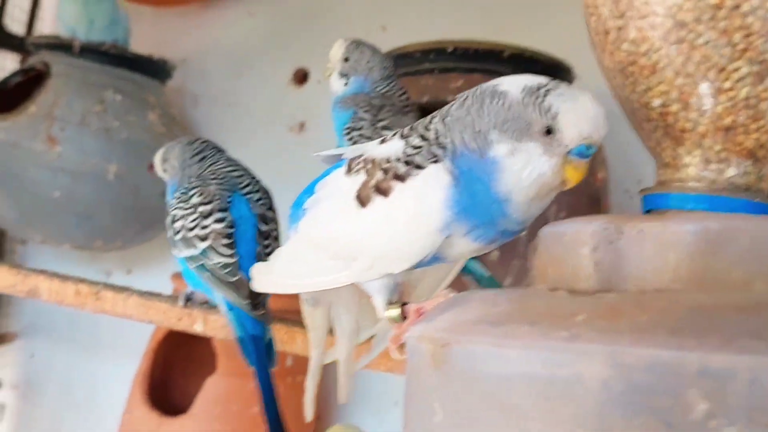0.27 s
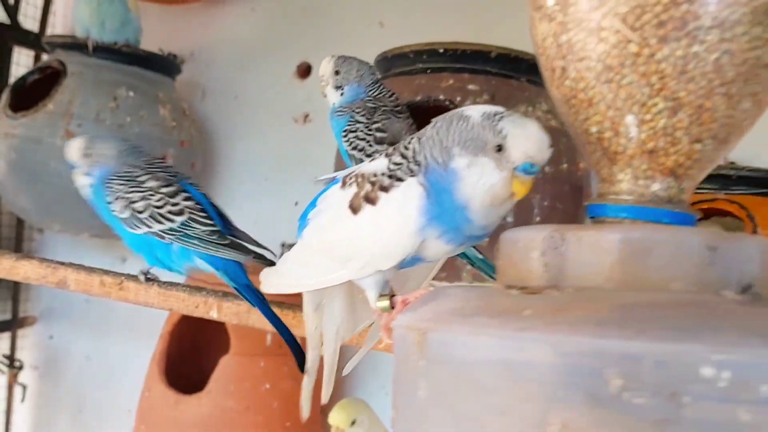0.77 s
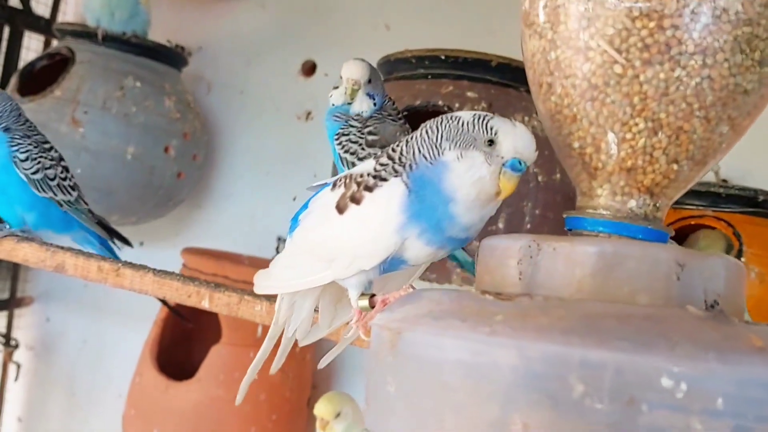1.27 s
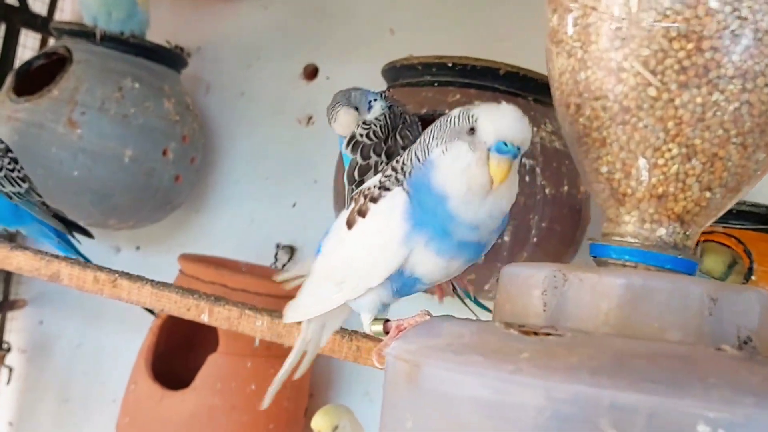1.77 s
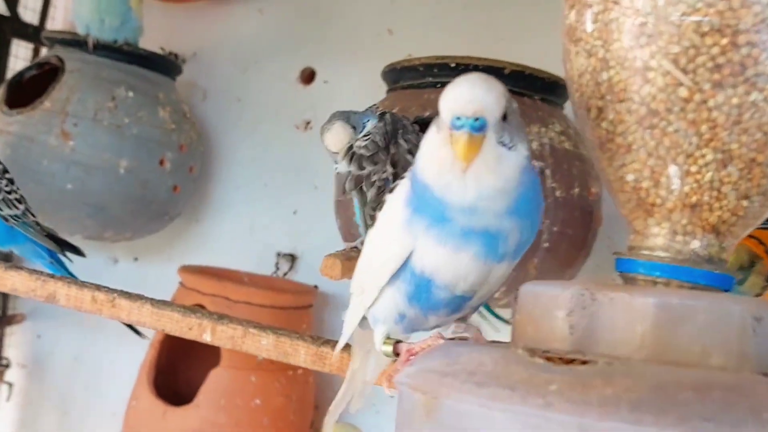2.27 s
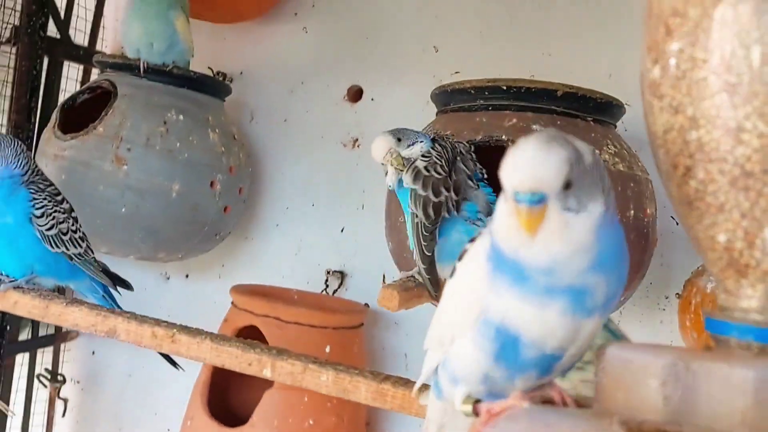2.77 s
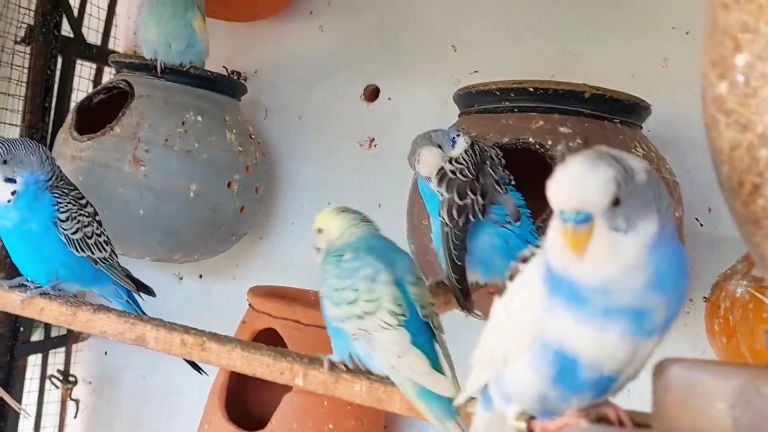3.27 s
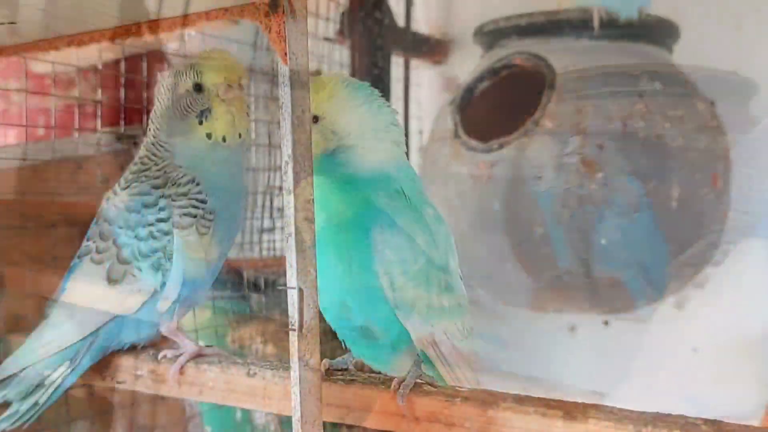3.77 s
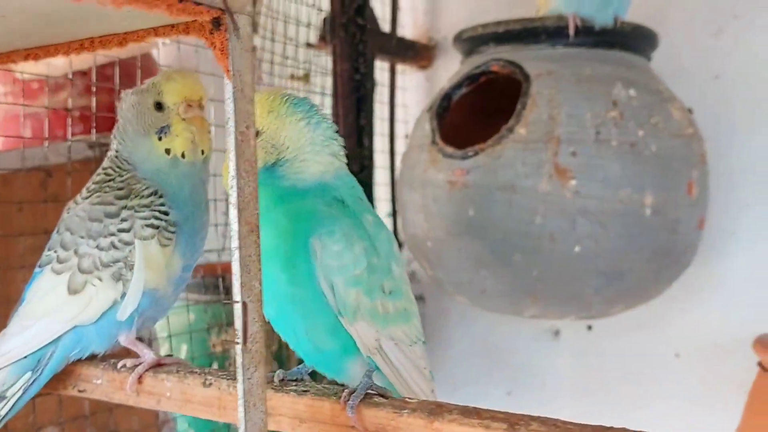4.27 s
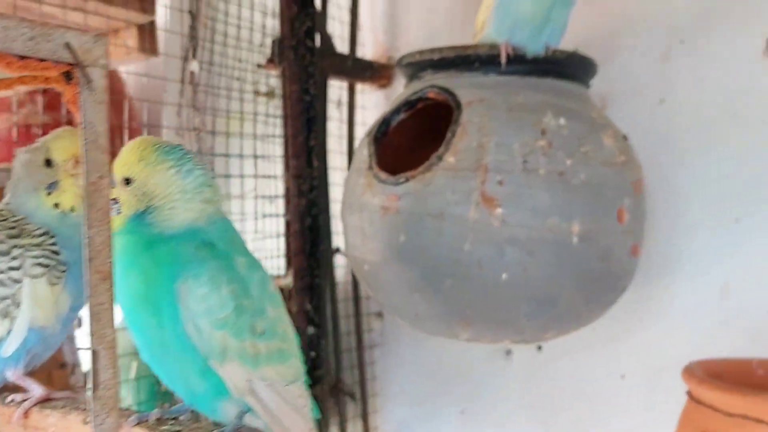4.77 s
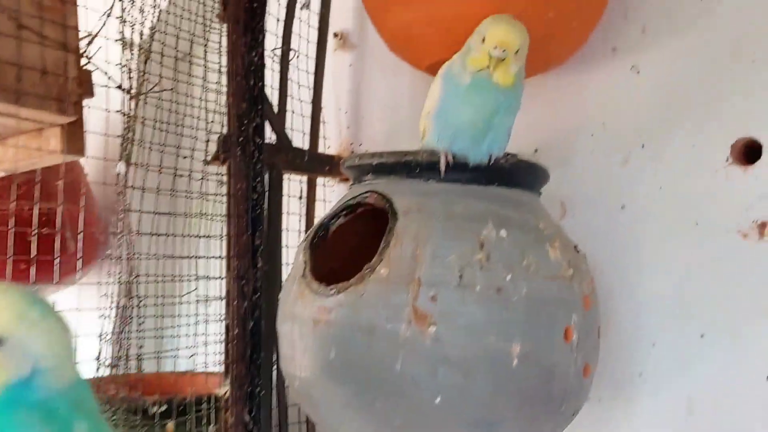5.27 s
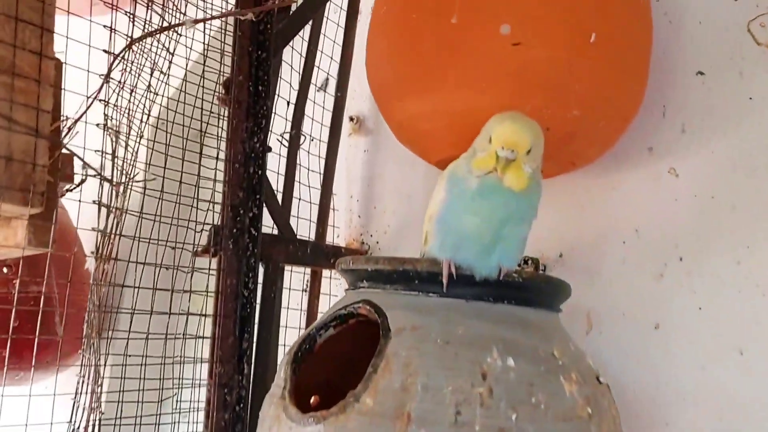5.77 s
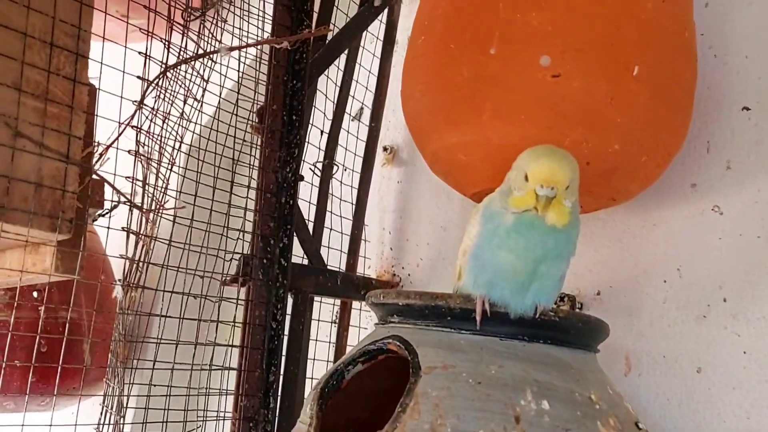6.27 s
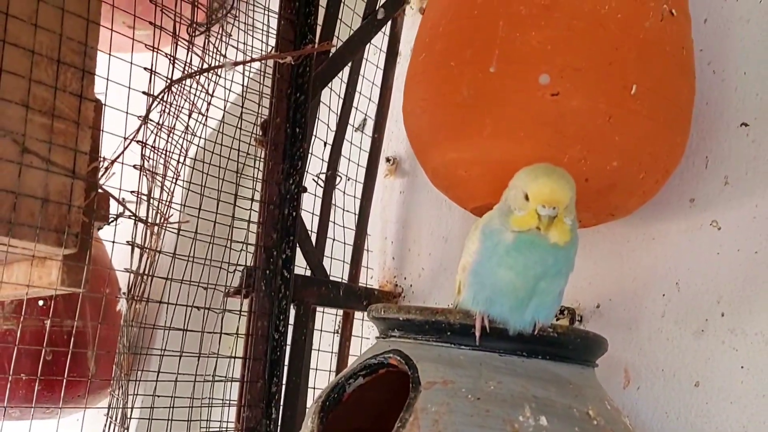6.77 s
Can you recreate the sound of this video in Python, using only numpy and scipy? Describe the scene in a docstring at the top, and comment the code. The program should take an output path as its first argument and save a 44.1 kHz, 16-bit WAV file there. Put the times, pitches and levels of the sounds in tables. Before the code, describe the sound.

A stereo close pickup of small parrots among clay pots: scattered short chirps, one very loud high shriek around one second, then sparse quiet calls over distant flock murmur and faint low rumble. Near four seconds the chatter thickens into rapid bright chirps, rough chucks and harsh rasps, with a sharp beak tap. Another burst of shrill cries comes around six and a half seconds before smaller chirps finish.

```python
"""Budgerigars chatter in a small aviary, over a faint hum, drone and rumble and a warbling flock.
Rasps (chopped voice and hiss), chucks and gliding chirps (modulated tones with overtones) open;
piercing shrieks and nasal calls (pulses under a throat resonance) follow, then taps (damped rings),
arched whistles and wing flutters (beating noise). The near chatter is densest from about 4 s on.
Close walls add brief reflections to all the bird sounds."""
import sys
import numpy as np
from scipy import signal
from scipy.fft import rfft, irfft, next_fast_len
from scipy.io import wavfile
from scipy.ndimage import map_coordinates

SR = 44100
rng = np.random.default_rng(int(sys.argv[2]) if len(sys.argv) > 2 else 0)


def dump_mix(stems):
    """Bounce the given channels to the path in sys.argv[1] as a 16-bit WAV at rate SR."""
    frames = np.atleast_2d(stems).T  # one column per channel
    limited = np.clip(frames, -1, 1)  # hard clip at full scale
    pcm = np.round(limited * 32767).astype(np.int16)
    wavfile.write(sys.argv[1], SR, pcm)


N = 309141

# Levels are relative: source gains, stereo balance and reflections come on top.
# Hum: time_s, level_db
HUM = [(0, -44.5), (.9, -42), (1.3, -50.5), (1.9, -53), (2.3, -46), (2.85, -42), (3, -67), (3.4, -49),
       (3.7, -42), (4.1, -36), (5.05, -34), (5.25, -62), (7.01, -56)]
# Drone above the hum: time_s, level_db
DRONE = [(0, -40.5), (.45, -42.5), (1.1, -55.5), (1.7, -58), (5.6, -59.5), (5.9, -42.5), (6.2, -64),
         (7.01, -59)]
# Low rumble: time_s, level_db
RUMBLE = [(0.0, -41), (1.74, -53), (2.16, -45.5), (3.96, -47), (4.63, -41), (6.81, -48.5), (7.01, -45.5)]
# Rumble spectrum: frequency_hz, density_db
RUMBLE_COLOUR = [(25, -22), (60, -5), (130, 4), (190, -1), (260, 7), (400, 0), (600, -6.5), (1200, -9.5),
                 (4000, -36), (12000, -37)]
# Distant flock: time_s, level_db
FLOCK = [(0.0, -33.5), (2.01, -38.5), (2.44, -30.5), (3.22, -39.5), (3.9, -26), (4.51, -23.5), (4.78, -19),
         (5.78, -26), (5.92, -23.5), (7.01, -23.5)]
# Flock wash spectrum: frequency_hz, density_db
FLOCK_COLOUR = [(400, -16.5), (800, -11), (1400, -3.5), (2400, -6.5), (4400, -6.5), (5600, -14),
                (8000, -23.5), (10000, -43.5), (15000, -54)]
# Stereo balance of the birds: time_s, left_minus_right_db
PAN = [(0, 1), (3.7, .3), (5, 2.5), (7.01, 2)]
# Harsh scolding rasps: start_s, length_s, level_db
RASPS = [(0.043, .014, -28.5), (0.321, 0.047, -21), (0.436, 0.0089, -25), (0.978, 0.014, -11),
         (2.281, 0.036, -28.5), (2.367, 0.062, -23), (2.441, 0.078, -22.5), (2.577, 0.097, -36),
         (3.681, .058, -32), (3.853, 0.08, -33.5), (4.062, 0.13, -28.5), (4.256, 0.092, -30),
         (4.569, .017, -27), (4.641, 0.011, -23), (4.759, 0.029, -28.5), (4.877, 0.15, -21),
         (5.022, 0.028, -21), (5.141, 0.07, -12), (5.234, 0.076, -16.5), (5.33, 0.081, -21),
         (5.419, 0.094, -16), (5.492, 0.098, -19), (5.607, 0.067, -19), (5.717, 0.21, -26.5),
         (5.987, 0.16, -25.5), (6.057, 0.06, -19), (6.159, 0.084, -21.5), (6.285, 0.015, -21),
         (6.45, 0.052, -14), (6.53, 0.028, -14.5), (6.761, 0.0077, -25.5)]
# Rasp spectrum: frequency_hz, density_db
RASP_COLOUR = [(500, -58), (1400, -18.5), (2800, 3.5), (4500, 3.5), (6600, -3.5), (8200, -12),
               (9600, -35.5), (12500, -25), (16000, -62)]
# Short rough chucks: start_s, pitch_hz, level_db
CHUCKS = [(.044, 1412, -28.5), (.7, 2190, -29), (0.774, 2146, -25.5), (.829, 2174, -24),
          (.921, 2270, -23.5), (1.147, 2280, -29.5), (1.229, 2495, -33), (1.294, 2280, -34),
          (1.372, 2170, -36), (1.655, 2180, -32.5), (2.128, 2190, -24), (2.2, 2270, -29.5),
          (2.515, 2324, -22), (2.585, 2880, -26.5), (4.256, 2710, -19.5), (4.484, 1940, -21.5),
          (4.563, 1945, -14.5), (4.675, 1943, -18), (4.727, 2006, -20), (4.828, 995, -25),
          (4.936, 1287, -24), (5.018, 1077, -26.5), (5.093, 2296, -16.5), (5.631, 2413, -16.5),
          (5.762, 1900, -16), (6.052, 2390, -20), (6.235, 1965, -20.5), (6.262, 1980, -16.5),
          (6.281, 2760, -24.5)]
# Gliding chirps: start_s, length_s, start_hz, end_hz, level_db, roughness (0-1)
CHIRPS = [(0.097, 0.076, 1502, 1492, -23.5, 0.06), (0.203, 0.031, 2170, 2580, -28.5, 0.25),
          (.263, .06, 2950, 2700, -24.5, 0.3), (.3, 0.034, 3070, 1894, -15, 0.4),
          (0.325, 0.047, 3300, 2850, -14.5, 0.28), (0.365, 0.033, 2250, 2380, -18.5, .1),
          (0.415, 0.018, 2237, 1690, -15.5, 0.25), (0.426, 0.016, 2520, 2535, -15.5, 0.25),
          (0.626, .049, 1640, 1413, -32, 0.08), (0.983, 0.02, 4000, 2500, -14.5, 0.48),
          (1.055, 0.018, 4600, 2600, -20, .8), (1.763, 0.087, 2150, 2300, -33.5, 0.33),
          (1.95, 0.058, 3150, 2570, -32, 0.42), (2.021, 0.05, 3630, 2610, -29, .12),
          (2.078, 0.062, 3204, 2660, -25.5, .1), (3.739, 0.029, 2900, 2194, -26, 0.42),
          (3.775, 0.0285, 2530, 3360, -27, 0.03), (3.838, 0.032, 3030, 2390, -22, 0.29),
          (3.878, 0.012, 2130, 2850, -17, 0.2), (3.971, 0.074, 2060, 2370, -22, 0.37),
          (4.106, 0.015, 2270, 2695, -18.5, 0), (4.142, 0.026, 4050, 3140, -17, 0.2),
          (4.409, 0.02, 3070, 2475, -15.5, 0.2), (4.613, 0.034, 4260, 4230, -16, 0.14),
          (4.631, 0.057, 3020, 2855, -10, 0.19), (4.679, 0.069, 3447, 3486, -11, 0.24),
          (4.756, 0.025, 3220, 2390, -11.5, 0.03), (4.76, .032, 5350, 4310, -18.5, .3),
          (4.78, 0.025, 2860, 3320, -12, 0.33), (4.95, 0.076, 2780, 3120, -15, 0.16),
          (5.021, 0.032, 3100, 2607, -13.5, 0.6), (5.116, 0.041, 2870, 3280, -10, 0.25),
          (5.218, 0.03, 3320, 3560, -14, 0.24), (5.377, .033, 3280, 2690, -17.5, 0.23),
          (5.485, 0.063, 3460, 3510, -18, 0.45), (5.67, 0.0293, 3760, 3280, -13.5, .18),
          (5.705, 0.082, 2900, 2433, -11.5, .18), (5.77, 0.04, 3940, 3190, -16, .2),
          (5.799, 0.041, 2573, 2705, -10, .12), (5.839, .077, 2213, 2834, -10.5, 0.14),
          (5.903, 0.035, 2714, 2000, -14.5, 0.64), (6.085, .054, 2880, 2170, -10.5, .18),
          (6.088, 0.0375, 4240, 3700, -16.5, .25), (6.133, 0.04, 2670, 2960, -16.5, .35),
          (6.272, .011, 4110, 4400, -13.5, .05), (6.455, 0.036, 2360, 2600, -11.5, 0.16),
          (6.539, 0.045, 2604, 2876, -7.5, 0.42), (6.591, 0.029, 2415, 2000, -16, .35),
          (6.636, .084, 2200, 1250, -32, .25), (6.754, 0.055, 2320, 2110, -23, 0.2),
          (6.808, 0.043, 1916, 2250, -16, 0.2), (6.843, 0.061, 2884, 3050, -20.5, 0.2),
          (6.9, 0.076, 2437, 2160, -21.5, 0.13), (6.933, 0.026, 2775, 3266, -21, 0.36)]
# Piercing near syllables: start_s, length_s, start_hz, end_hz, level_db, roughness (0-1)
SHRIEKS = [(0.433, 0.0072, 5000, 5380, -23, 0.08), (0.955, .026, 4935, 4520, -6, 0.14),
           (0.984, 0.032, 5176, 5415, -3, 0.15), (1.016, .028, 5480, 5133, -4.5, .16),
           (1.044, 0.013, 6380, 6480, -10.5, 0.02), (1.193, 0.0125, 4450, 4190, -27.5, 0.37),
           (1.211, .015, 6380, 6480, -26, 0.16), (6.465, 0.028, 4770, 4650, -9, 0.71),
           (6.484, 0.037, 4660, 5420, -4, 0.13), (6.514, 0.02, 5740, 6700, -11, 0.08),
           (6.536, 0.027, 4500, 4650, -13, 0.71), (6.568, .026, 3860, 4600, -6.5, .14),
           (6.597, 0.031, 4860, 4730, -6.5, .04)]
# Nasal calls: start_s, length_s, pitch_hz, throat_hz, level_db
NASALS = [(0.477, 0.12, 408, 2670, -63), (0.562, 0.075, 685, 3050, -50), (2.615, 0.076, 429.5, 2750, -33.5),
          (3.074, 0.11, 702, 3840, -35.5), (3.504, .14, 515, 3760, -33), (3.858, 0.088, 521, 4900, -34),
          (4.165, 0.15, 577, 3860, -24.5), (4.471, 0.13, 617, 4000, -26.5),
          (4.821, 0.092, 561, 3760, -21.5), (6.361, 0.12, 575, 3730, -28), (6.439, 0.049, 578, 1090, -30.5),
          (6.595, 0.085, 619, 1460, -32)]
# Pitch sag of louder nasal calls: level_db, share_lost (0-1)
SAG = [(-35, 0.02), (-30.5, 0.17)]
# Beak clicks and foot knocks on perches and pots: start_s, ring_hz, decay_t60_s, level_db
TAPS = [(1.011, 362, 0.084, -16.5), (1.013, 230, 0.089, -26.5), (2.839, 238, 0.18, -32.5),
        (3.018, 1480, 0.028, -31), (3.365, 1430, 0.023, -34), (3.391, 4200, 0.022, -32),
        (3.709, 2250, 0.0068, -18.5), (4.675, 2520, 0.036, -6), (6.319, 2010, 0.022, -22),
        (6.328, 1960, 0.021, -13.5), (6.339, 1980, 0.02, -15)]
# One bird's repeated whistle: start_s, arch_length_s, level_db
WHISTLES = [(1.526, 0.072, -30.5), (2.834, 0.084, -28), (3.357, .072, -32), (4.689, 0.083, -29)]
# Whistle arch: start_hz, middle_hz, end_hz
ARCH_HZ = [5080, 6090, 5030]
# Held note after the arch: start_hz, middle_hz, end_hz
HOLD_HZ = [5170, 4484, 4570]
# Wing flutters: start_s, length_s, level_db
FLUTTERS = [(2.101, 0.42, -48), (3.036, 0.14, -41), (3.421, 0.27, -40), (5.293, 0.15, -36),
            (5.748, 0.11, -38)]
# Wing noise spectrum: frequency_hz, density_db
WING_COLOUR = [(30, -42), (70, 3), (200, -2.5), (400, 5), (600, -2), (1200, -8.5), (5000, -37)]

TIME_S = np.arange(N) / SR
TOP_HZ = 16100  # upper band limit
WASH_DB = -11  # before the flock level
LAG_SPREAD_MS = .18  # birds perch all around the two microphones
RASP_LAG_MS, RASP_LAG_SPREAD_MS = -.19, .05  # negative: left first
RASP_HZ, RASP_DB, RASP_OCTAVES_PER_DB = 5060, -18, .002  # louder rasps are brighter
OVERTONE_HZ, OVERTONE_DB_PER_OCTAVE = 1854, -16.5  # the beak favours overtones of low notes
SETTLE = .7  # share of a glide done half way through
EARLY_T60_S = .054


def undb(db):
    """Decibels to amplitude gain."""
    return 10 ** (np.asarray(db) / 20)


def unit(x):
    """Scale to rms 1."""
    return x / np.sqrt(np.mean(x ** 2) + 1e-18)


def curve(rows):
    """Interpolate (time_s, value) rows at every sample."""
    return np.interp(TIME_S, *np.transpose(rows))


def wobble(size, rate_hz):
    """Smooth random signal, spread near 1, with rate_hz random points per second."""
    steps = np.arange(size) * rate_hz / SR
    return map_coordinates(rng.standard_normal(2048), [steps], order=3, mode="wrap")


def colour(x, points, shift=0.99):
    """Filter x by (frequency_hz, db) points, frequencies scaled by shift; rms 1."""
    size = next_fast_len(x.shape[-1] + 256)
    hz, db = np.transpose(points)
    log_hz = np.log(np.fft.rfftfreq(size, 1 / SR) + 1)
    gain = undb(np.interp(log_hz, np.log(hz * shift), db))
    return unit(irfft(rfft(x, size) * gain, size)[..., :x.shape[-1]])


def swell(length_s, bluntness, lean=0.84):
    """Progress 0-1 and a rounded rms-1 envelope, quicker to rise than to fall."""
    u = np.linspace(0, 1, max(int(length_s * SR), 64))
    build_up = 1 - np.exp(-u * length_s / .002)
    arch = np.abs(np.sin(np.pi * u ** lean)) ** bluntness
    return u, unit(build_up * arch)


def add(out, x, start_s, lag_ms=0.):
    """Mix x into both channels; positive lag_ms delays left against right."""
    for row, side in zip(out, (1, -1)):
        start = int(np.clip(round((start_s + side * lag_ms / 2e3) * SR), 0, N - 1))
        row[start:start + len(x)] += x[:N - start]


def background(hum_hz=100.6, drone_hz=135, hum_db=-1, rumble_db=1, apart=0.87):
    """Mains hum, wavering drone and low noise rumble; the rumble differs partly between sides."""
    hum = np.sin(2 * np.pi * hum_hz * TIME_S) * undb(curve(HUM) + hum_db)
    drone_phase = 2 * np.pi * np.cumsum(drone_hz + 3 * wobble(N, 13)) / SR
    drone = np.sin(drone_phase) * undb(curve(DRONE))
    noise = rng.standard_normal(N) + apart * rng.standard_normal((2, N))
    rumble_level_db = curve(RUMBLE) + rumble_db + 3.86 * wobble(N, 21)
    rumble = colour(noise, RUMBLE_COLOUR) * undb(rumble_level_db)
    balance = undb(np.array([[.8], [-.8]]))
    return (np.sqrt(2) * (hum + drone) + rumble) * balance


def syrinx(length_s, pitches_hz, rough, overtone_db, buzz_hz=680, spread_hz=620, shake_hz=260,
           bite=1.15, throb=0.27, step_db=-8, beak_hz=7500):
    """One gliding note; a slower membrane chops and bends it, turning whistle into chuck."""
    u, envelope = swell(length_s, 0.33)
    rough = np.clip(rough, 0, 1)
    zigzag = (.006 + .3 * min(rough, .42) ** 2) * wobble(len(u), 130)
    grains = (throb + .5 * rough) * wobble(len(u), 206.6)
    # parabola through start, middle and end pitch
    hz = np.polyval(np.polyfit([0, .5, 1], pitches_hz, 2), u) * (1 + zigzag)
    membrane_hz = buzz_hz * (1 + 0.21 * wobble(len(u), 157.3))
    buzz = np.cos(2 * np.pi * np.cumsum(membrane_hz) / SR)
    bend_hz = rough * (spread_hz * buzz + shake_hz * wobble(len(u), 696.0))
    phase = 2 * np.pi * np.cumsum(hz + bend_hz) / SR
    tone = np.sin(phase)
    for k in range(2, 5):
        beak = (k * hz < TOP_HZ) / np.hypot(1, (k * hz / beak_hz) ** 3)
        overtone_gain = undb(min(overtone_db, 3) + (k - 1.5) * step_db)
        tone = tone + overtone_gain * beak * np.sin(k * phase)
    strength = np.exp(grains + bite * rough * buzz)
    # the short windpipe radiates little below the note
    windpipe = signal.butter(3, .55 * min(pitches_hz), "high", fs=SR, output="sos")
    return signal.sosfilt(windpipe, tone * unit(envelope * strength)) * np.sqrt(2)


def nasal(length_s, start_hz, end_hz, throat_hz, width_octaves=0.34, chest_db=-13):
    """Gliding harmonics, each wavering in level, under a broad throat resonance."""
    u, envelope = swell(length_s, 0.4)
    hz = (start_hz + (end_hz - start_hz) * u ** 1.4) * (1 + .011 * wobble(len(u), 320))
    phase = 2 * np.pi * np.cumsum(hz) / SR
    tone = 0
    for k in range(2, 14):
        throat = np.exp(-.5 * (np.log2(k * hz / throat_hz) / width_octaves) ** 2)
        chest = undb(chest_db) * (k * hz < throat_hz)
        waver = undb(4.5 * np.interp(u, np.linspace(0, 1, 6), rng.standard_normal(6)))
        line = np.sin(k * phase + 2 * np.pi * rng.random())
        tone = tone + waver * (throat + chest) * line
    return unit(tone) * envelope


def flock(count=160, chucks_db=-4.5, calls_share=0.57):
    """Distant chucks, a nasal call with every second one, and noise for their blurred echoes."""
    chuck_mix, call_mix = np.zeros((2, 2, N))
    for k, draws in enumerate(rng.random((count, 8))):
        when, length, pitch, bend, slide, rough, throat, side = draws
        start_s, lag_ms = (k + when) * N / SR / count, side - .5
        hz = (1450 + 1800 * pitch) * np.array([1, 0.74 + 0.26 * bend, 0.645 + .5 * slide])
        chuck = syrinx(0.0203 + 0.0349 * length, hz, .15 + .45 * rough, -16.0)
        add(chuck_mix, chuck, start_s, lag_ms=lag_ms)
        if k % 2:
            call_hz = 380 + 300 * bend
            end_hz = call_hz * (.92 + 0.1115 * slide)
            call = nasal(0.0585 + 0.051 * rough, call_hz, end_hz, 2500 + 2000 * throat)
            add(call_mix, call, start_s, lag_ms=-lag_ms)
    voices = unit(chuck_mix) + calls_share * unit(call_mix)
    wash = colour(rng.standard_normal((2, N)), FLOCK_COLOUR) * undb(4.62 * wobble(N, 30))
    return (voices * undb(chucks_db) + wash * undb(WASH_DB)) * undb(curve(FLOCK))


def rasps(pulse_hz=230, reference_hz=5000, voice_hz=750, hiss_db=-4):
    """A jittering voice and hiss, chopped into uneven puffs, ring the throat and open beak."""
    out = np.zeros((2, N))
    for (start_s, length_s, db), side in zip(RASPS, rng.standard_normal(len(RASPS))):
        centre_hz = RASP_HZ * 2 ** (RASP_OCTAVES_PER_DB * (db - RASP_DB))
        u, envelope = swell(length_s + 0.011, 0.85, lean=.72)
        pulse = 2 * np.pi * np.cumsum(pulse_hz * (1 + 0.313 * wobble(len(u), 197.2))) / SR
        voice = 2 * np.pi * np.cumsum(voice_hz * (1 + 0.0509 * wobble(len(u), 220.5))) / SR
        squeal = 0
        for k in range(2, 19):
            flare = np.exp(.4 * wobble(len(u), 160))  # separate for each overtone
            squeal = squeal + np.sin(k * voice + 2 * np.pi * rng.random()) * flare
        puffs = np.exp(.65 * np.cos(pulse) + .1 * wobble(len(u), 110))
        hiss = rng.standard_normal(len(u)) * undb(hiss_db)
        rasp = colour(puffs * (unit(squeal) + hiss), RASP_COLOUR, centre_hz / reference_hz)
        lag_ms = RASP_LAG_MS + RASP_LAG_SPREAD_MS * side
        add(out, rasp * envelope * undb(db), start_s - .002, lag_ms=lag_ms)
    return out


def overtone_tilt(hz):
    """Decibels the beak adds to the overtones of a note at this pitch."""
    return OVERTONE_DB_PER_OCTAVE * np.log2(hz / OVERTONE_HZ)


def chucks(length_s=.023, rise=1.143, rough=0.368, overtone_db=-7, gain_db=-0.5, lag_ms=-0.058):
    """Brief throaty syllables of one pitch shape: nearly level, then flicked upward."""
    out = np.zeros((2, N))
    for (start_s, hz, db), side in zip(CHUCKS, rng.standard_normal(len(CHUCKS))):
        note = syrinx(length_s, [hz, hz, hz * rise], rough, overtone_db + overtone_tilt(hz))
        add(out, note * undb(db + gain_db), start_s, lag_ms=lag_ms + LAG_SPREAD_MS * side)
    return out


def glide(length_s, start_hz, end_hz, rough, overtone_db, overhang_s=.002):
    """A note that slides quickly from its first pitch and settles on its last."""
    middle_hz = start_hz + SETTLE * (end_hz - start_hz)
    return syrinx(length_s + 2 * overhang_s, [start_hz, middle_hz, end_hz], rough, overtone_db)


def chirps(gain_db=-3.5, overtone_db=-11.0, lag_ms_per_db=0.11):
    """Near birds' rising and falling notes, overtones weaker at higher pitch."""
    out = np.zeros((2, N))
    for row, side in zip(CHIRPS, rng.standard_normal(len(CHIRPS))):
        start_s, length_s, start_hz, end_hz, db, rough = row
        note = glide(length_s, start_hz, end_hz, rough, overtone_db + overtone_tilt(end_hz))
        # mean lag follows the stereo balance
        lag_ms = lag_ms_per_db * np.interp(start_s, *np.transpose(PAN)) + LAG_SPREAD_MS * side
        add(out, note * undb(db + gain_db), start_s, lag_ms=lag_ms)
    return out


def shrieks(gain_db=0.0, overtone_db=-14, lag_ms=-.05):
    """The closest bird's loud, high gliding calls, all with one stereo lag."""
    out = np.zeros((2, N))
    for start_s, length_s, start_hz, end_hz, db, rough in SHRIEKS:
        note = glide(length_s, start_hz, end_hz, rough, overtone_db)
        add(out, note * undb(db + gain_db), start_s, lag_ms=lag_ms)
    return out


def nasals():
    """Near drawn-out calls; the pitch sags more the harder they are pushed."""
    out = np.zeros((2, N))
    for start_s, length_s, hz, throat_hz, db in NASALS:
        end_hz = hz * (1 - np.interp(db, *np.transpose(SAG)))
        call = nasal(length_s, hz, end_hz, throat_hz)
        add(out, call * undb(db), start_s, lag_ms=rng.uniform(-0.14, .2))
    return out


def taps(crack=0.091):
    """A brief noise crack and one damped ring."""
    out, t = np.zeros((2, N)), TIME_S[:SR // 4]
    for start_s, hz, t60_s, db in TAPS:
        ring = np.sin(2 * np.pi * hz * t) * np.exp(-np.log(1000) * t / t60_s)
        click = crack * rng.standard_normal(len(t)) * np.exp(-t / 0.00054)
        add(out, (ring + click) * undb(db), start_s)
    return out


def whistles(hold_s=0.0412, overlap_s=0.0097, arch_db=1.0, hold_db=0.0, rough=0.014,
             overtone_db=-34, lag_ms=.02):
    """A nearly pure whistle arches up and over, then a short second note follows."""
    out = np.zeros((2, N))
    for start_s, length_s, db in WHISTLES:
        arch = syrinx(length_s, ARCH_HZ, rough, overtone_db)
        hold = syrinx(hold_s, HOLD_HZ, rough, overtone_db)
        add(out, arch * undb(db + arch_db), start_s, lag_ms=lag_ms)
        add(out, hold * undb(db + hold_db), start_s + length_s - overlap_s, lag_ms=lag_ms)
    return out


def wings(beat_hz=19):
    """Soft noise pushes of air, one for each wing beat."""
    out = np.zeros((2, N))
    for start_s, length_s, db in FLUTTERS:
        u, envelope = swell(length_s, 0.26)
        beats = unit(np.exp(0.37 * np.sin(2 * np.pi * beat_hz * length_s * u)))
        air = colour(rng.standard_normal(len(u)), WING_COLOUR)
        add(out, air * beats * envelope * undb(db), start_s)
    return out


def aviary(x, early_db=-9, tail_db=-17, tail_t60_s=0.17):
    """Close walls and pots reflect at once, as sparse decaying noise; a fainter, longer tail is added."""
    t = TIME_S[:SR // 2]
    noise = rng.standard_normal((2, 2, len(t))) * (t > .0015)
    early = noise[0] ** 3 * np.exp(-np.log(1000) * t / EARLY_T60_S)  # cubing makes it sparse
    tail_colour = [(300, -20.5), (2500, 15.5), (5000, 13.0), (8000, -8), (16000, -67)]
    tail = colour(noise[1], tail_colour) * np.exp(-np.log(1000) * t / tail_t60_s)
    response = (unit(early) * undb(early_db) + unit(tail) * undb(tail_db)) / np.sqrt(len(t))
    return x + signal.fftconvolve(x, response, axes=1)[:, :N]


def scene():
    """Birds, balanced left to right, in their aviary over the background."""
    birds = flock() + rasps() + chucks() + chirps() + shrieks()
    birds = birds + nasals() + taps() + whistles() + wings()
    balance = undb(curve(PAN) * np.array([[.5], [-.5]]))
    return background() + aviary(birds * balance)


def record(dry, ceiling=0.96, low_cut_hz=42):
    """Peaks overload the microphone; then the deep bass and the top are cut."""
    clipped = np.clip(dry, -ceiling, ceiling)
    low_cut = signal.butter(2, low_cut_hz, "high", fs=SR, output="sos")
    top_cut = signal.ellip(8, .1, 50, TOP_HZ, fs=SR, output="sos")
    return signal.sosfiltfilt(top_cut, signal.sosfilt(low_cut, clipped))


dry = scene()
out = record(dry)
dump_mix(out)
```